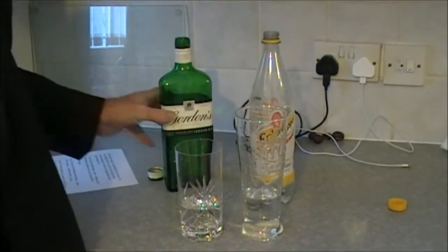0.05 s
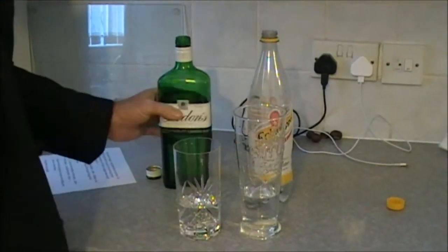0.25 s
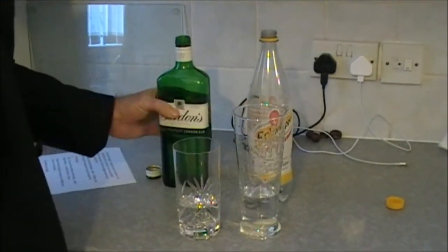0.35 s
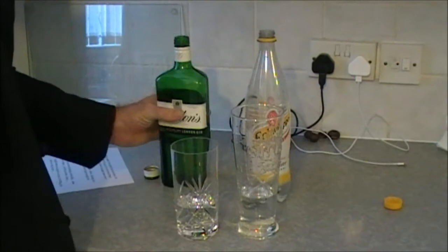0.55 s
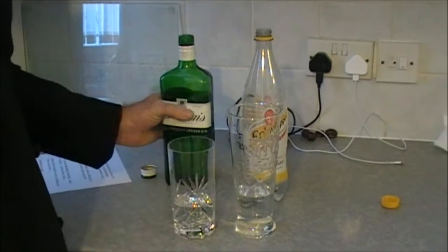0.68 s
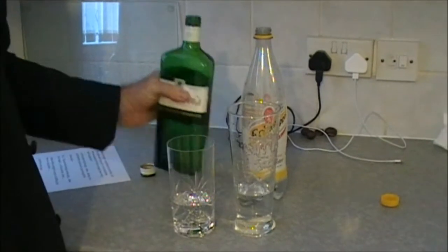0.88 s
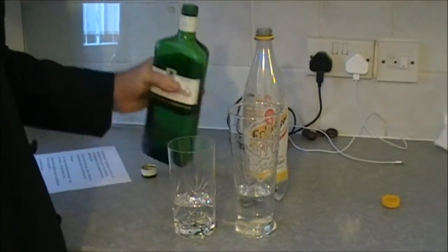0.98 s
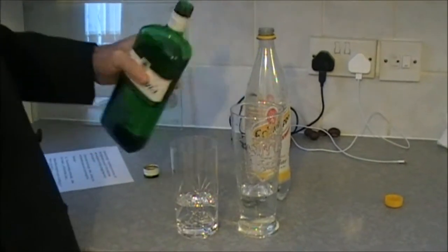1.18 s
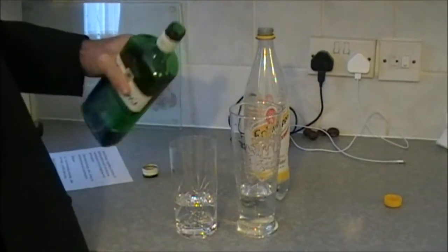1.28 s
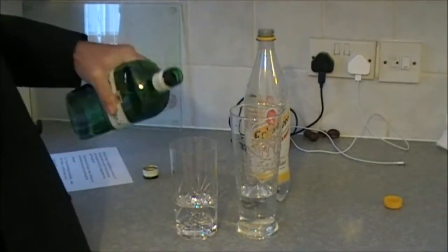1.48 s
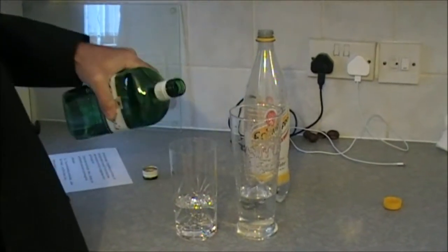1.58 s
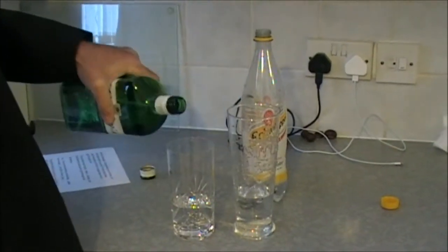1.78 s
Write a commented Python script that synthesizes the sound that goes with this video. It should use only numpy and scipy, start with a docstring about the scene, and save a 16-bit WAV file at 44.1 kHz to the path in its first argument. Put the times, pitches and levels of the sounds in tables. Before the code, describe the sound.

A glass bottle scrapes and judders across a counter in two short pulls and clinks once against a drinking glass as it lifts. Faint cloth rustle follows, over the quiet noise and thin whine of a small kitchen.

```python
"""In a small tiled kitchen, a glass bottle is dragged twice over the worktop. Its base sticks and
slips, so it judders, crunches over grit and makes the worktop drone. It shudders as it tips and
knocks a tumbler as it lifts off: the glass rings briefly and the worktop thumps. A sleeve rustles
faintly as the arm rises, over quiet room noise and a thin steady whine."""
import sys
import numpy as np
from scipy import signal
from scipy.fft import rfft, irfft
from scipy.io import wavfile
from scipy.ndimage import uniform_filter1d

SR = 44100
rng = np.random.default_rng(int(sys.argv[2]) if len(sys.argv) > 2 else 0)


def waveform_to_disk(signal):
    """Save audio, clipped to [-1, 1], as 16-bit WAV at the path in sys.argv[1]."""
    frames = np.transpose(np.atleast_2d(signal))
    scaled = np.clip(frames, -1, 1) * 32767
    samples = np.round(scaled).astype(np.int16)
    wavfile.write(sys.argv[1], SR, samples)


N = 81585

# Stereo width of room noise and sleeve. Each row: frequency in Hz, left-right likeness.
AIR_LIKENESS = [(40, -0.73), (150, -0.52), (300, -0.32), (700, -0.55), (1500, -0.35), (4000, 0.47),
                (7000, 0.44), (13000, -0.044)]
# The two drags, a list each. Each row: time in seconds, slip force in dB, grit level in dB.
DRAGS = [
    [(.197, -61.5, -79), (.217, -34.5, -62), (.244, -26.5, -53.5), (.268, -23, -55.5), (.284, -26.5, -57.5),
     (.308, -23, -51.5), (.332, -25, -76), (.385, -27.5, -86), (.404, -34, -90), (.44, -44.5, -74),
     (.475, -52, -75.5), (.545, -65, -76.5)],
    [(.553, -51, -81.5), (.566, -44.5, -67), (.59, -40.5, -80), (.622, -46, -69.5), (.646, -36.5, -61.5),
     (.665, -34.5, -62.5), (.694, -34, -73.5), (.715, -46.5, -83), (.76, -45, -102)],
]
# Modes of the worktop under the bottle. Each row: frequency in Hz, relative level in dB when
# rubbed, the same when knocked, seconds to fade by 60 dB.
WORKTOP_MODES = [(138.6, -33, -17, 0.27), (147.7, -5.5, -18, 0.29), (186.3, 0.5, -12.5, 0.15),
                 (212, -16, -16.5, 0.047), (282, -0.5, -2.5, 0.31), (330.6, -14, -20.5, 0.43),
                 (380.1, -2, -12.5, 0.25), (424, -12.5, -19.5, 0.18), (509.3, -6.5, -27, 0.33),
                 (572.5, -13, -26, 0.16), (666, -20.5, -21, 0.13), (695.7, -12.5, -27.5, 0.3),
                 (776, -16.5, -31, 0.083), (1185.5, -19, -53, 0.28)]
# The dull, unpitched part of a slip. Each row: frequency in Hz, relative level in dB.
THUD_TONE = [(30, -57.5), (60, -10.5), (100, -18.5), (140, -2), (300, 9.5), (520, -4), (780, -4),
             (1050, -14.5), (1750, -29.5), (2300, -39.5), (4000, -45), (9000, -70)]
# The base catches. Each row: start in seconds, scratch level in dB, bump level in dB.
CATCHES = [(0.246, -59, -33.5), (0.307, -54, -22.5), (0.561, -78, -46), (0.639, -62, -42)]
# Bottle hits tumbler. Each row: start in seconds, clink level in dB, thump level in dB.
KNOCKS = [(0.6982, -30.5, -23)]


def amp(db):
    """Decibels to gain."""
    return 10 ** (np.asarray(db) / 20)


def unit(x):
    """Scales to rms 1."""
    return x / np.sqrt(np.mean(x ** 2) + 1e-20)


def read(points, hz):
    """Reads a table on a log-frequency axis."""
    f, value = np.transpose(points)
    return np.interp(np.log(hz + 1), np.log(f), value)


def envelope(rows, column=1):
    """Gain over time from one dB column; silent outside the rows."""
    rows = np.array(rows)
    return amp(np.interp(np.arange(N) / SR, rows[:, 0], rows[:, column], left=-150, right=-150))


def since(start):
    """Seconds elapsed since the start, zero before."""
    return np.maximum(np.arange(N) / SR - start, 0)


def convolve(x, response):
    """Convolution, cut to the length of the scene."""
    return signal.fftconvolve(x, response)[:N]


def colour(x, tone, size=4096):
    """Minimum-phase EQ with the given curve and unit energy."""
    log_gain = np.log(amp(read(tone, abs(np.fft.fftfreq(size, 1 / SR)))))
    taps = np.fft.ifft(np.exp(np.conj(signal.hilbert(log_gain)))).real[:size // 2]
    return convolve(x, taps / np.linalg.norm(taps))


def low_cut(x, hz):
    """Rolls off the bass."""
    return signal.sosfilt(signal.butter(4, hz, "high", fs=SR, output="sos"), x)


def stereo(x, likeness):
    """Blends two unrelated signals into left and right with a given likeness, held within -1 to 1."""
    a, b = rfft(x)
    alike = np.clip(read(likeness, np.fft.rfftfreq(N, 1 / SR)), -1, 1)
    mid, side = a * np.sqrt((1 + alike) / 2), b * np.sqrt((1 - alike) / 2)
    return irfft(np.array([mid + side, mid - side]), N)


def pan(x, balance):
    """Leans each band to the left or right."""
    db = read(balance, np.fft.rfftfreq(N, 1 / SR))
    return irfft(rfft(x) * amp([db / 2, -db / 2]), N)


def ring(modes, t):
    """Dying sines of alternating polarity."""
    return sum(amp(db) * np.exp(-np.log(1000) * t / t60) * np.sin(2 * np.pi * hz * t) * (-1) ** k
               for k, (hz, db, t60) in enumerate(modes))


def grains(per_s, spread_db):
    """Random tiny clicks of uneven size."""
    clicks = (rng.random(N) < per_s / SR) * rng.standard_normal(N)
    return unit(clicks * amp(spread_db * np.minimum(rng.exponential(1, N), 3)))


def burst(start, decay_s):
    """Noise that starts at once and dies away."""
    return rng.standard_normal(N) * (since(start) > 0) * np.exp(-since(start) / decay_s)


def steadied(x, size=1100):
    """Holds the short-term power at 1, so that the hand's force alone sets the level."""
    power = uniform_filter1d(uniform_filter1d(x ** 2, size), size // 2)
    return x / np.sqrt(abs(power) + 1e-9)


def room_noise():
    """A quiet, wide bed of dark noise."""
    tone = [(25, -34.5), (60, -15.5), (100, -0.5), (150, -2.5), (200, 1), (290, -1), (420, -5.5),
            (600, -7.5), (1000, -9.5), (1500, -15), (3000, -20.5), (4500, -23), (7500, -22.5), (10000, -32),
            (13000, -35.5), (14600, -56)]  # Each row: frequency in Hz, relative level in dB.
    noise = stereo(rng.standard_normal((2, N)), AIR_LIKENESS)
    return amp(-62.5) * np.array([unit(colour(x, tone)) for x in noise])


def sleeve():
    """Cloth fibres rub in a soft rustle that swells as the arm rises."""
    movement = [(0, -64), (.18, -64), (.6, -67.5), (.92, -69), (1.05, -63), (1.25, -65.5), (1.41, -65),
                (1.52, -74.5), (1.85, -81)]  # Each row: time in seconds, level in dB.
    cloth_tone = [(50, 5.5), (150, 5), (500, 7), (1500, 0), (3500, -8.5), (7000, -7.5), (10000, -15.5),
                  (14000, -40)]  # Each row: frequency in Hz, relative level in dB.
    fibres = np.array([grains(per_s=6000, spread_db=0.83) for _ in range(2)])
    return np.array([colour(x, cloth_tone) for x in stereo(fibres, AIR_LIKENESS)]) * envelope(movement)


def whine():
    """Thin, steady tones that waver very slightly in pitch together."""
    tones = [(296, -76), (441, -82.5), (1081, -78), (4409, -85.5), (5486, -88.5)]  # Each row: frequency in Hz, level in dB.
    waver = 1 + .0004 * unit(uniform_filter1d(rng.standard_normal(N), size=2000))
    return sum(amp(db) * unit(np.sin(2 * np.pi * hz * np.cumsum(waver) / SR)) for hz, db in tones)


def slipping(per_s=260, jitter=.6, spread_db=1, count=700):
    """One edge of the base sticks and slips unevenly: a train of dull thuds."""
    gap, strength = rng.standard_normal((count, 2)).T
    onsets = (np.cumsum(np.exp(jitter * gap)) / per_s * SR).astype(int)
    slips = np.bincount(onsets, amp(spread_db * strength), N)[:N]
    return colour(slips - slips.mean(), THUD_TONE)


def judder():
    """Slips set the worktop droning and also thud directly, following the force of the drag."""
    slips, drone = slipping(), np.zeros(N)
    for k, (hz, db, _, t60) in enumerate(WORKTOP_MODES):
        mode = convolve(slips, ring([(hz, 0, t60)], since(0)))
        drone += (-1) ** k * amp(db) * steadied(mode, size=2600)
    thuds = steadied(slipping())
    force = sum(envelope(drag) for drag in DRAGS)
    return steadied(amp(-2.5) * unit(drone) + amp(-6.5) * thuds) * force


def grit():
    """Fine grains crunch under the moving base, with a scratch wherever it catches."""
    tone = [(300, -9), (1300, 18.5), (2800, 3.5), (4200, -5), (6500, -1.5), (8200, -6.5), (10500, -22.5),
            (12000, -26), (14000, -40)]  # Each row: frequency in Hz, relative level in dB.
    catch_s = 0.0026
    pressure = sum(envelope(drag, column=2) for drag in DRAGS) * amp(5.5)
    scratches = sum(amp(db) * since(start) / catch_s * np.exp(-since(start) / catch_s)
                    for start, db, _ in CATCHES)
    return colour(grains(per_s=3100, spread_db=-3) * (pressure + scratches), tone)


def bumps():
    """Each catch of the base also bumps the worktop."""
    return colour(sum(amp(db) * burst(start, decay_s=0.0039) for start, _, db in CATCHES), THUD_TONE)


def crunch():
    """A single hard grain cracks brightly under the base."""
    cracks = [(0.445, -66.5)]  # Each row: start in seconds, level in dB.
    tone = [(500, -17), (3000, -4), (7000, 9), (10000, 1), (14000, -11)]  # Each row: frequency in Hz, relative level in dB.
    return colour(sum(amp(db) * burst(start, decay_s=.007) for start, db in cracks), tone)


def shudder():
    """As the bottle tips onto its edge, slower and heavier slips shake the worktop's bass."""
    force = [(.645, -58), (.66, -34.5), (.705, -36.5), (.73, -46), (.785, -58), (.82, -78)]  # Each row: time in seconds, level in dB.
    tone = [(60, -11), (110, 0.5), (145, -3), (200, -2), (260, -20), (600, -27), (2000, -58)]  # Each row: frequency in Hz, relative level in dB.
    return steadied(colour(slipping(per_s=180, jitter=0.29), tone)) * envelope(force)


def clink():
    """Glass meets glass: a short crack, the main rings of both vessels and a blur of many weak ones."""
    # Bottle and tumbler. Each row: frequency in Hz, relative level in dB, seconds to fade by 60 dB.
    glass_modes = [(1540, -22, 0.056), (1648, 0.5, 0.1), (1750, -14.5, 0.11), (1751.4, 5, 0.069),
                   (2070, -24.5, .1), (2346, 4, 0.047), (2360, -30, 0.052), (3195, -22, 0.14),
                   (3184, -13.5, 0.12), (3233, -9.5, 0.18), (3250, -25, 0.036), (3350, -7.5, 0.074),
                   (3615, -15.5, 0.086), (3715, -16.5, 0.049), (4430, -23, 0.11), (5410, -10.5, 0.05),
                   (5800, -31, .04), (6130, -16, 0.052), (6600, -15, 0.046), (7150, -21, 0.065),
                   (7660, -22, 0.078), (11740, -41, .04)]
    # The contact, and the bottle's crowded weak modes. Each row: frequency in Hz, relative level in dB.
    crack_tone = [(60, -41), (200, -15), (500, 10), (1300, 3.5), (1800, -4.5), (3500, 4), (4500, -10.5),
                  (6000, -6), (7700, -18.5), (9000, -36), (14000, -49)]
    blur_tone = [(100, -46), (1000, -11), (1450, -11), (1680, 9), (2000, -5), (2400, 2.5), (2850, -15.5),
                 (3300, -0.5), (3900, -14.5), (6500, -21.5), (9000, -39.5)]
    contact_s = 0.002
    out = np.zeros(N)
    for start, db, _ in KNOCKS:
        t = since(start)
        crack = amp(-1) * colour(burst(start, decay_s=0.0051), crack_tone)
        blur = amp(-12.5) * colour(burst(start, decay_s=0.019), blur_tone)
        attack = 1 - np.exp(-t / contact_s)
        out += amp(db) * attack * (ring(glass_modes, t) + crack + blur)
    return out


def thump():
    """The knock also passes down through the tumbler and swells softly in the worktop's modes."""
    modes = [(hz, db, t60) for hz, _, db, t60 in WORKTOP_MODES]
    rise_s = 0.0026
    swell = sum(amp(db) * (1 - np.exp(-(since(start) / rise_s) ** 2)) * ring(modes, since(start))
                for start, _, db in KNOCKS)
    return low_cut(swell, hz=110)


def handling():
    """A faint, diffuse handling tick on the camera."""
    ticks = [(1.41, -61)]  # Each row: start in seconds, level in dB.
    tone = [(200, -20), (700, -5), (1000, -19), (1600, 5), (2200, -20), (6000, -12), (12000, -33)]  # Each row: frequency in Hz, relative level in dB.
    sides = sum(amp(db) * np.array([burst(start, decay_s=0.0057) for _ in range(2)])
                for start, db in ticks)
    return np.array([colour(x, tone) for x in sides])


def kitchen(x, wet_db):
    """Direct sound plus the diffuse tail of a small hard room."""
    decay = [(150, 0.48), (280, 0.4), (600, 0.46), (1600, 0.43), (2400, 0.37), (3400, 0.46), (8000, 0.28)]  # Each row: frequency in Hz, seconds to fade by 60 dB.
    likeness = [(100, 0.9), (500, 0.56), (2000, 0.8), (4000, .7), (8000, 1.5)]  # Each row: frequency in Hz, left-right likeness (capped at 1 in use).
    build_s = 0.0025
    hz, t, bands = signal.stft(stereo(rng.standard_normal((2, N)), likeness), SR, nperseg=256)
    bands = bands * np.exp(-np.log(1000) * t / read(decay, hz)[:, None]) * np.minimum(t / build_s, 1)
    tails = signal.istft(bands, SR)[1][:, :N]
    return np.array([x + amp(wet_db) * convolve(x, tail / np.linalg.norm(tail)) for tail in tails])


def echoes(x):
    """First reflections from worktop and tiles."""
    surfaces = [(.0031, 0.083, 0.045), (.0088, 0.06, 0.067), (0.0201, .2, .2)]  # Each row: delay in seconds, left gain, right gain.
    t = np.arange(N) / SR
    return sum(np.outer([left, right], np.interp(t - delay, t, x, left=0))
               for delay, left, right in surfaces)


def scene():
    """Bottle, worktop and tumbler in the kitchen, over room noise, sleeve and whine."""
    # Panning of the action and of the bed. Each row: frequency in Hz, left minus right in dB.
    action_balance = [(60, 1), (140, 2), (200, 2), (290, 3), (520, 2.5), (1000, 2), (2000, 0), (4000, -0.2),
                      (8000, -3.5), (12000, 1)]
    bed_balance = [(40, -3), (150, 1.5), (300, 1), (1000, 1.5), (4000, 0), (10000, -1.5)]
    left_lag_s = .000013
    glass = clink()
    worktop = low_cut(judder() + shudder() + bumps() + thump(), hz=55)
    action = kitchen(worktop, wet_db=-10) + kitchen(grit() + crunch(), wet_db=0.5)
    action += kitchen(glass, wet_db=-6) + echoes(glass)
    lag = np.exp(-2j * np.pi * np.outer([left_lag_s, 0], np.fft.rfftfreq(N, 1 / SR)))
    action = irfft(rfft(action) * lag, N)
    bed = room_noise() + sleeve() + whine()
    return pan(action, action_balance) + pan(bed, bed_balance) + handling()


def record(dry):
    """A steep high cut takes off the very top of the treble."""
    edge_hz = 14600
    taps = signal.firwin(255, edge_hz, window=("kaiser", 8), fs=SR)
    return signal.oaconvolve(dry, taps[None], "same", axes=1)


dry = scene()
out = record(dry)
waveform_to_disk(out)
```